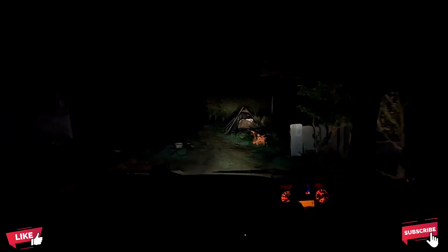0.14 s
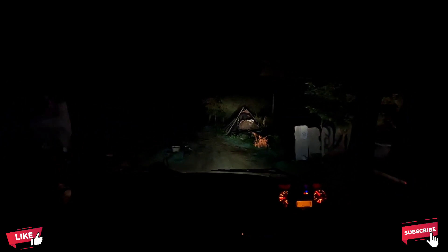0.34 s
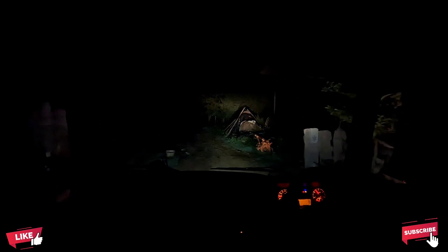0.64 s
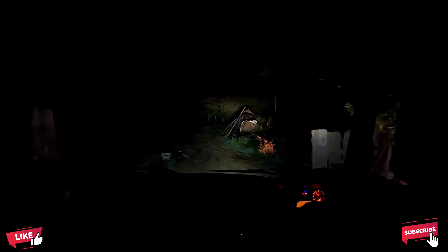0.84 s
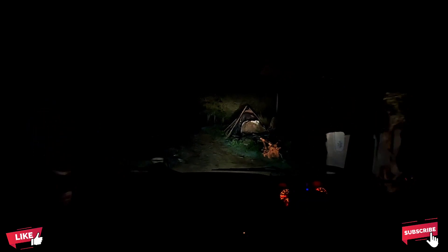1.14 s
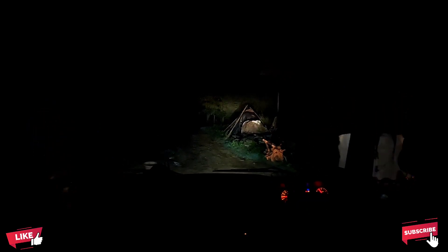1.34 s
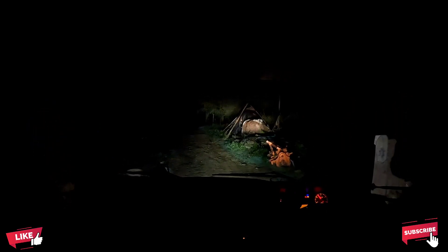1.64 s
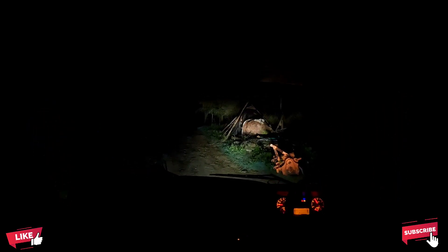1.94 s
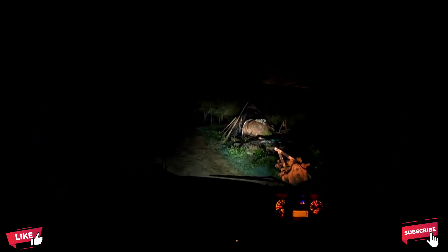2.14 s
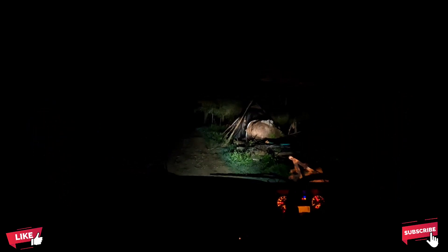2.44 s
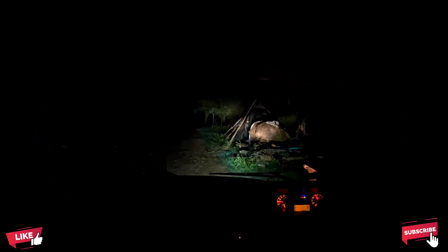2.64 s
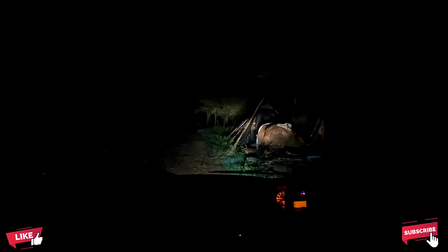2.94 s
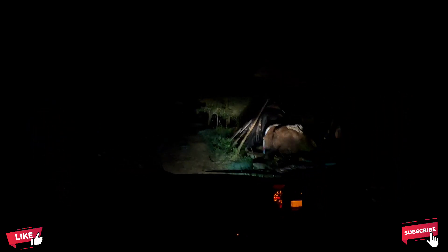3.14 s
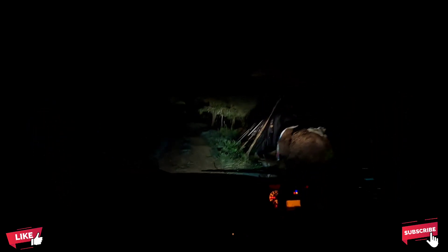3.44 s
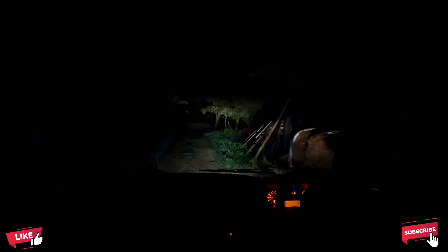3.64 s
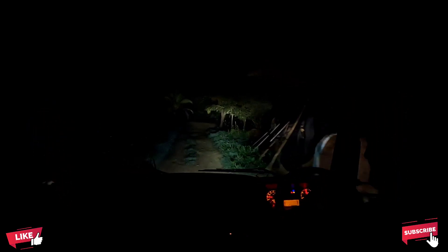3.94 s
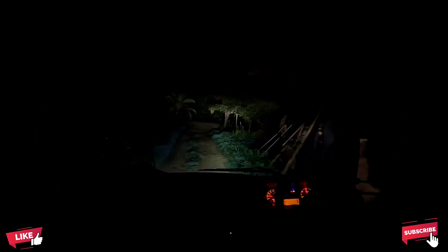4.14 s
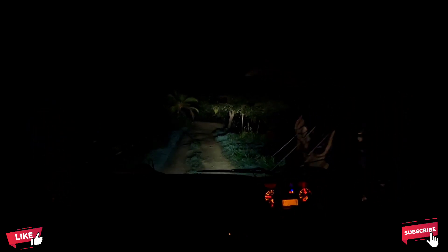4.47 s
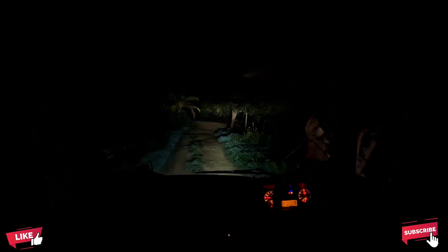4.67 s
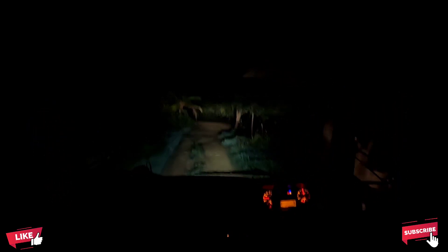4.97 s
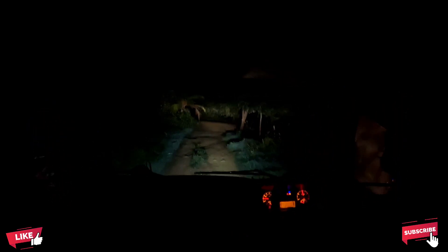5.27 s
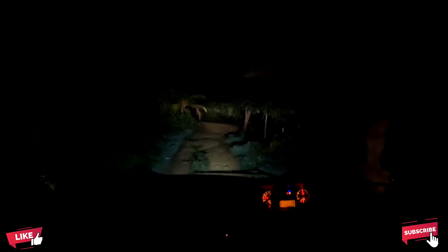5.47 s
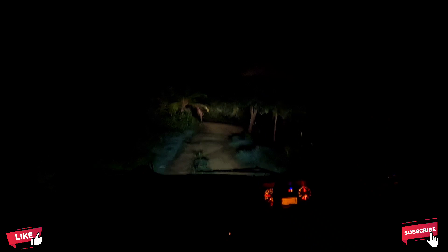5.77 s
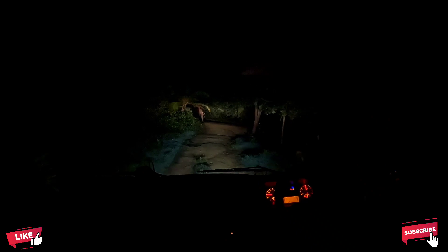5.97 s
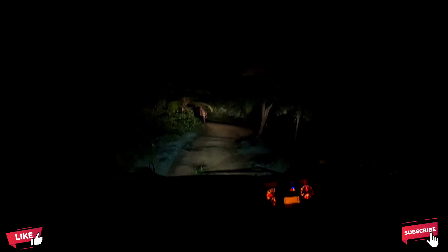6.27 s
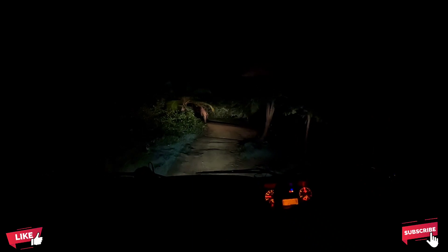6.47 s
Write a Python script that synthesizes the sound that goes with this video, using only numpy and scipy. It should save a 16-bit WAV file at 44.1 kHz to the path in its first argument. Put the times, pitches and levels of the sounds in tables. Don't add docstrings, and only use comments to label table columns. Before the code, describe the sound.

A heavy diesel labours up a dirt track, cab panels roaring and buzzing, loose metal sizzling, plastic knocking and small fittings clinking.

```python
import sys
import numpy as np
from scipy import signal
from scipy.fft import next_fast_len
from scipy.io import wavfile
from scipy.ndimage import uniform_filter1d

SR = 44100
rng = np.random.default_rng(int(sys.argv[2]) if len(sys.argv) > 2 else 0)


def persist_wave(psi):
    counts = np.round(np.clip(psi, -1, 1) * 32767).astype(np.int16)
    wavfile.write(sys.argv[1], SR, np.atleast_2d(counts).T)


def nominal_scale(level):
    x = np.asarray(level, float) / 20
    return 10 ** x


N = 291501

# (time [s], gear tooth rate [Hz], firing tone level [dB], gear whine level [dB])
DRIVELINE = [(0.0, 278, -21.5, -58), (0.25, 284, -31, -62), (0.42, 290.8, -19, -31),
             (0.76, 287.3, -31, -48), (1.13, 287.9, -27, -37.5), (1.7, 295, -19.5, -50),
             (1.87, 305, -22, -32.5), (2.12, 305, -22.5, -34), (2.3, 308, -23.5, -31.5),
             (2.45, 315, -23, -33.5), (2.64, 330, -20.5, -29.5), (2.82, 325, -24.5, -31),
             (2.95, 332, -24, -32), (3.1, 341, -26.5, -36), (3.17, 338, -23, -44), (3.3, 338, -26, -34),
             (3.48, 344, -51, -46), (3.6, 349, -37, -29), (3.8, 351, -32.5, -36.5),
             (4.1, 354.7, -29.5, -42), (4.4, 360.2, -23, -35.5), (4.9, 373.3, -22.5, -36.5),
             (5.1, 384, -28.5, -39), (5.25, 378, -26, -39), (5.5, 395, -38, -43), (5.65, 400, -35, -25.5),
             (5.75, 356, -31, -40), (6.0, 368, -31, -34), (6.1, 390, -37, -35), (6.2, 400, -33, -30.5),
             (6.33, 395, -28.5, -51), (6.43, 360, -31, -43), (6.55, 360, -31, -32)]
# (time [s], firing pitch over its geared value [ratio])
ENGINE_LUG = [(0.0, .92), (0.3, .97), (0.5, 1.02), (0.8, .96), (1.15, .96), (1.38, 1.09), (1.7, .96),
              (2.0, 1.03), (2.3, 1.0), (2.65, .99), (3.1, 1.0), (3.4, 1.05), (3.7, 1.08), (4.1, 1.0),
              (4.35, 1.05), (4.7, 1.0), (5.3, 1.03), (6.3, 1.04)]
# (time [s], change [dB])
FIRING_SURGES = [(0.24, -5), (0.44, 0), (0.79, -5), (0.88, 8), (0.96, -4), (1.12, 8), (1.19, -8),
                 (1.4, 2.5), (1.54, -3), (1.62, -11), (1.76, -11), (2.11, 6), (2.2, -6), (2.32, 2.5),
                 (2.43, 1.5), (2.63, 2.5), (2.77, -14), (2.87, 7), (2.93, -7.5), (3.02, 3), (3.55, -8),
                 (3.7, 10), (3.9, -12), (4.13, 9.5), (4.2, -9), (4.4, 4), (4.58, -3), (4.72, 0.5),
                 (4.94, -11), (5.18, 3), (5.42, -10), (5.53, 4), (5.77, -1), (6.02, 8), (6.23, 6),
                 (6.38, -4), (6.53, 6)]
# (multiple of firing rate [ratio], level [dB])
ENGINE_ORDERS = [(.5, -17), (1.5, -19), (2, -25), (3, -22.5)]
TEETH_PER_FIRING, SURGE_S = 6.3, 0.061

# (time [s], swing level [dB], held for [s])
CAB_JOLTS = [(0.25, -25.5, 0.0092), (0.481, -16.5, 0), (0.79, -16, 0.0016), (1.1, -21, 0), (1.55, -18, 0.1),
             (1.93, -17.5, 0.021), (2.1, -12.5, 0), (2.28, -13, 0.038), (2.62, -11.5, 0), (2.76, -17.5, 0),
             (2.84, -18.5, 0.053), (3.12, -16.5, 0.12), (3.33, -14.5, 0.28), (3.6, -12.5, 0.0093),
             (3.81, -11.5, 0.058), (4.07, -13, 0.074), (4.3, -16.5, 0.12), (4.449, -13.5, 0.032),
             (4.7, -15, 0), (4.92, -13.5, 0.034), (5.1, -25, 0.037), (5.2, -12.5, 0.25),
             (5.56, -11.5, 0.052), (5.75, -12, 0.013), (6.0, -13, 0), (6.15, -17, 0.00087),
             (6.35, -16.5, .26)]
# (time [s], swing pitch [Hz])
MOUNT_PITCH = [(0.0, 23.7), (0.11, 25.1), (0.22, 22.3), (0.37, 22.3), (0.48, 24.72), (1.12, 25.26),
               (1.25, 23.52), (1.67, 23.4), (1.77, 24.9), (2.83, 25.06), (3.09, 26.54), (3.48, 24.66),
               (5.12, 27.15), (5.21, 24.88), (5.89, 24.9), (6.04, 22.27), (6.41, 23.65), (6.61, 23.4)]
SWING_RISE_DB_PER_S, SWING_FALL_DB_PER_S = 151, 158

# (time [s], shake level [dB])
TRACK_SHAKE = [(0.0, -10), (0.2, -8), (0.5, -4), (0.74, -8), (1.2, -5), (1.56, -3.5), (1.76, -5.5),
               (1.9, -0.5), (2.2, -3), (3.1, 0.5), (3.4, 1), (4.35, 1), (4.53, 2), (4.66, 1), (5.3, 3),
               (5.62, 5), (5.82, 1.5), (6.61, 2)]
# (time [s], extra rumble [dB])
TYRE_RUTS = [(0.0, -1.5), (0.5, 3), (0.9, 4.5), (1.56, 8), (1.87, 4.5), (3.138, 2), (4.4, 2.5), (4.9, 6.5),
             (5.6, 1.5), (5.96, 5.5), (6.2, 8.5), (6.61, -0.5)]
# (frequency [Hz], level [dB per Hz])
ROAR_SPECTRUM = [(110, -23), (190, -7), (285, -0.5), (357, -1), (463, -3.5), (555, -8), (648, -7),
                 (893, -13), (1500, -19.5), (1950, -24), (3300, -120)]
# (frequency [Hz], level [dB per Hz])
RUMBLE_SPECTRUM = [(8.2, -37), (14, -5.5), (43, 0), (61, -14), (97, -16.5), (150, -18.5), (260, -19.5),
                   (340, -61), (570, -120)]
# (frequency [Hz], width [Hz], level [dB])
PANEL_RINGS = [(111.3, 17, 0.5), (166, 12, -9), (286, 24, 2), (459, 28, 4.5), (634, 33, 0), (964, 103, -6),
               (1317, 100, -18.5)]
RUT_S = 0.049
ROAR_DB, RATTLE_DB, TYRE_DB = -30, -40, -34
ROAR_FOLLOWS, RATTLE_FOLLOWS, TYRE_FOLLOWS = 0.83, 0.8, 0.12
TYRE_LUMPS_DB = 1.43

# (frequency [Hz], level [dB per Hz])
BUZZ_SPECTRUM = [(410, -36), (700, -1), (896, -7), (981, 0.5), (1190, -4.5), (1370, -4), (3510, -25),
                 (5000, -45), (6500, -53), (11000, -120)]
# (frequency [Hz], level [dB per Hz])
HISS_SPECTRUM = [(2120, -26), (3600, -20), (4940, 2.5), (5660, 0), (7750, 0), (10900, -3.5), (15100, -15),
                 (15800, -20)]
SETTLES_S, SETTLED_DB = 5.8, -3.5

# (frequency [Hz], width [Hz], level [dB])
METAL_RINGS = [(5650, 510, 3), (7430, 1300, -2.5), (11000, 560, -13)]
# (start [s], end [s], sizzle level [dB])
CHATTER_SPELLS = [
    (0.46, 0.86, -61),
    (1.153, 1.62, -56.5),
    (1.663, 2.599, -56),
    (2.586, 3.296, -56),
    (3.3, 5.1, -57),
    (5.1, 5.62, -54.5),
]
# (time [s], swell [dB])
CHATTER_BURSTS = [(1.2, -2), (1.41, 2), (1.445, 1), (1.65, -5), (1.75, -7), (2.05, 5), (2.3, -1), (2.5, -3),
                  (2.68, 6), (2.78, 2), (2.87, 2), (2.95, 7), (3.05, -2), (3.1, 5.5), (3.17, 4.5),
                  (3.25, -7), (3.32, 2), (3.42, 3), (3.52, 3), (3.6, 3), (3.68, 0), (3.76, 4), (3.86, -5),
                  (4.03, 1), (4.2, -5), (4.27, 3), (4.43, 5.5), (4.53, 3), (4.61, 2), (4.68, -1), (4.74, 1),
                  (4.82, -2), (4.88, 3), (4.98, -3), (5.08, 0), (5.13, -2), (5.19, 5), (5.27, 2),
                  (5.37, -3), (5.44, 4.5), (5.5, -2)]
# (time [s], change of pitch [Hz])
SEAT_SHIFT = [(1.1, 50), (1.48, 100), (1.52, 350.5), (1.62, 0), (2.6, -49), (2.95, 50), (3.3, 30),
              (3.5, -50.5), (3.62, 120), (4.1, 61), (4.6, 29.5), (4.9, -150), (5.2, 0.5), (5.6, -120)]
SPELL_EASE_S, RESTING_DB, BURST_S = 0.088, -87, 0.026

# (time [s], peak level [dB], main ring [Hz], crack level [dB])
HEAVY_KNOCKS = [(0.164, -33, 870, -22), (0.3158, -23.5, 1500, -20), (0.7906, -27.5, 976, -27),
                (1.26, -28.5, 1080, -24), (1.4435, -25.5, 1750, -21), (1.8153, -26.5, 1374, -10.5),
                (2.441, -38, 1360, -23), (3.4165, -27.5, 1900, -14), (4.0742, -24, 1371, -34),
                (4.3265, -30, 2560, -11), (4.6541, -15, 1300, -57), (5.5239, -17.5, 1347, -38),
                (5.532, -20, 450, -43), (5.5498, -31, 1616, -10), (5.72, -25.5, 600, -40),
                (5.6146, -22, 1910, -22), (5.655, -24, 854, -40), (5.7055, -32.5, 3670, -6),
                (5.712, -25, 950, -35), (5.7675, -36, 1160, -2), (6.19, -21, 516, -60)]
# (time [s], peak level [dB], main ring [Hz], crack level [dB])
LIGHT_KNOCKS = [(0.3027, -29, 2400, -14), (0.9567, -27, 2120, -25), (1.5, -23.5, 1440, -31),
                (1.5183, -35, 2100, -30), (1.5638, -25, 1610, -28), (1.6054, -23, 810, -50),
                (2.0287, -22, 1335, -18), (5.222, -34, 4500, -8), (4.657, -28, 470, -20),
                (4.076, -38, 4300, -10), (2.0657, -19, 1350, -36), (2.1444, -29.5, 940, -12),
                (2.8669, -31, 1080, -34), (3.793, -23, 950, -31), (4.3981, -25, 1320, -39),
                (4.7269, -26, 1040, -20), (5.1862, -22, 1360, -32), (5.219, -23, 1400, -19),
                (5.571, -30, 2580, -8), (5.576, -20.5, 1200, -23), (6.0855, -40, 3500, 0),
                (6.476, -39, 2830, -7),
                (1.4657, -27, 890, -32), (1.817, -33, 2600, -20), (1.947, -36, 1490, -12),
              (1.532, -28, 1800, -27), (1.55, -28, 2000, -28), (1.575, -27, 2220, -23),
              (2.5211, -40, 2100, -17), (2.6287, -39, 2101, -17), (2.9699, -34, 1855, -18),
              (3.0449, -35, 1850, -20), (3.127, -35, 2100, -23), (3.3936, -37, 1890, -18),
              (3.7009, -40, 2100, -15), (3.871, -30, 1798, -22), (3.9718, -40, 2130, -12),
              (4.2445, -33, 2108, -14), (5.537, -22, 1004, -27), (5.596, -37, 1850, -18),
              (5.633, -26.5, 3300, -12), (5.658, -32, 4500, -10), (5.695, -28, 3700, -10),
              (5.7503, -40, 2100, -14), (5.78, -36, 3000, -9)]
# (frequency [Hz], level [dB], time to fall by 60 dB [s])
TRIM_MODES = [(340, -5, .03), (468, -1, .04), (640, -2, .028), (820, -3, .022), (1040, -1, .026),
              (1365, 0, .03), (1600, -3, .024), (1850, -3, .024), (2150, -5, .026), (2500, -5, .026),
              (2850, -8, .02), (3300, -9, .02), (3800, -12, .016), (4500, -12, .016), (5200, -18, .01)]
HEAVY_THUD_DB, LIGHT_THUD_DB = 6, -0.5

# (time [s], peak level [dB], main ring [Hz], top level [dB])
METAL_CLINKS = [(0.0478, -50, 7300, -6), (0.2892, -34, 6450, -27), (0.3245, -38, 6800, -12),
                (0.4555, -38.5, 5530, -24), (0.5994, -46, 7680, -18), (0.7562, -40, 6040, -21),
                (1.2236, -43, 5714, -15), (1.498, -37.5, 5900, -17), (1.511, -40, 6200, -20),
                (1.567, -46, 5900, -20), (1.575, -48, 7900, -20), (1.58, -46, 5650, -19),
                (1.8552, -46, 8300, -14), (0.825, -48, 5980, -18), (2.6304, -48, 5550, -20),
                (3.6994, -45, 5918, 9), (3.772, -39, 9560, -9), (3.9732, -35.5, 6834, -3),
                (4.0787, -45, 5980, -15), (4.247, -45, 5580, -18), (4.3262, -37.5, 5482, -18),
                (4.7894, -43, 7953, -10), (5.165, -42, 5707, -22), (5.2394, -46, 5600, -14),
                (5.3042, -39, 5740, -3), (5.5292, -45, 5535, -11), (5.5494, -48, 9550, -4),
                (5.6094, -44, 10500, -4), (5.629, -36, 11500, 0), (5.6071, -41, 13000, 0),
                (5.5966, -46, 12000, 0), (5.7096, -44, 5475, -15), (5.7765, -45, 7900, -3),
                (6.1697, -39.5, 8050, -11), (6.4751, -31, 7920, -14), (6.478, -37.5, 6180, -20),
                (0.184, -45, 9500, -8), (0.3162, -45, 9500, -8), (0.345, -47, 6800, -15),
                (1.2451, -42, 9500, -8), (2.4543, -50, 10500, -8), (2.4882, -49, 10500, -8),
                (2.7347, -48, 10490, -8), (3.1462, -48, 9500, -8), (3.7938, -48, 10460, -8),
                (4.4428, -39, 11600, -9), (5.695, -40, 5745, -6), (6.437, -46, 7900, -20)]
# (frequency [Hz], level [dB], time to fall by 60 dB [s])
FITTING_MODES = [(4600, -12, .005), (5650, -2, .012), (6200, -1, .01), (6800, -3, .007), (7400, -3, .007),
                 (7940, -2, .01), (8600, -4, .006), (9500, -5, .005), (10500, -6, .005), (11600, -7, .004),
                 (13000, -8, .003), (14500, -9, .003)]

# (start [s], end [s], trim level [dB], metal level [dB], bright grit level [dB])
LOAD_SLIDES = [
    (1.495, 1.638, -33.5, -49, -62),
    (5.52, 5.8, -38, -62, -47.5),
    (0.16, 0.23, -48, -62, -60),
]
# (time [s], peak level [dB], pitch [Hz])
FLOOR_THUMPS = [
    (0.45, -36, 105),
    (0.7, -28.5, 95),
    (1.8, -27, 112),
    (2.1, -29, 112),
    (4.5, -26, 95),
    (5.62, -30, 108),
    (6.2, -25, 38),
    (1.9, -20, 38),
    (0.8, -25, 30),
]
THUMP_S = 0.033
SQUEAK_FROM_S, SQUEAK_HZ, SQUEAK_DB = 6.05, 2830, -64
OVERLOAD_S, OVERLOAD_LASTS_S, OVERLOAD_DB = 5.5875, .0022, -11


def rms_one(x):
    return x / np.sqrt(np.mean(x ** 2) + 1e-20)


def in_time(rows):
    s, *columns = np.transpose(rows)
    return [np.interp(np.arange(N) / SR, s, c) for c in columns]


def swells_db(rows, width_s):
    t = np.arange(N) / SR
    return sum(db * np.exp(-((t - s) / width_s) ** 2) for s, db in rows)


def drift(rate):
    r = np.exp(-80 * np.pi * rate / SR)
    slow = signal.lfilter([1], [1, -2 * r, r * r], rng.standard_normal(N // 40 + 2002))[2000:]
    return np.interp(np.arange(N) / 40, np.arange(len(slow)), rms_one(slow))


def bandpass(x, order, low_hz, high_hz):
    return signal.sosfilt(signal.butter(order, [low_hz, high_hz], "band", fs=SR, output="sos"), x)


def lowpass(x, order, hz):
    return signal.sosfilt(signal.butter(order, hz, fs=SR, output="sos"), x)


def resonance(x, hz, width_hz):
    r = np.exp(-np.pi * width_hz / SR)
    w = 2 * np.pi * hz / SR
    return signal.lfilter(np.array([1, 0, -1]) * (1 - r * r) / 2, [1, -2 * r * np.cos(w), r * r], x)


def double_resonance(x, hz, width_hz):
    return resonance(resonance(x, hz, width_hz), hz, width_hz)


def ring(push, hz, t60):
    r, w = nominal_scale(-60 / (t60 * SR)), 2 * np.pi * hz / SR
    return signal.lfilter([0, np.sin(w)], [1, -2 * r * np.cos(w), r * r], push)


def near(hz, centre_hz, octaves):
    return np.exp(-(np.log2(hz / centre_hz) / octaves) ** 2)


def tone(hz, level_db, wobble):
    phase = 2 * np.pi * np.cumsum(hz * (1 + wobble * drift(5.44))) / SR
    return np.sqrt(2) * nominal_scale(level_db) * np.sin(phase)


def banded_noise(spectrum, patchy_db, shared_db):
    hz, level_db = np.transpose(spectrum)
    octaves = np.log2(min(hz[-1], .35 * SR) / hz[0])
    edges = hz[0] * 2 ** np.arange(0, octaves + 1 / 3, 1 / 3)
    white, together, out = rng.standard_normal((2, N + SR)), drift(6.1), 0
    for k, (low, high) in enumerate(zip(edges, edges[1:])):
        band = bandpass(white[k % 2], 2, low, high)[SR:]
        band_db = np.interp(np.log(low * high) / 2, np.log(hz), level_db)
        out = out + band * nominal_scale(band_db + patchy_db * drift(18.0) + shared_db * together)
    return rms_one(out)


def grains(per_s, spread_db):
    sizes = nominal_scale(spread_db * np.minimum(rng.exponential(1, N), 5)) * rng.choice([-1, 1], N)
    touches = rng.random(N) < per_s * nominal_scale(6.0 * drift(14.0)) / SR
    return rms_one(sizes * touches) + 1e-18


def engine():
    whine_hz, tone_db, whine_db = in_time(DRIVELINE)
    firing_hz = whine_hz / TEETH_PER_FIRING * in_time(ENGINE_LUG)[0]
    orders = sum(tone(k * firing_hz, tone_db + level_db + 0.87 * drift(0.5), wobble=0.019)
                 for k, level_db in ENGINE_ORDERS)
    firing_db = tone_db - 1 + swells_db(FIRING_SURGES, SURGE_S) + 2.5 * drift(9.0)
    firing = tone(firing_hz, firing_db, wobble=.03)
    waver_db = np.interp(whine_hz, [330, 345], [1.2, 3.5]) * drift(14.0)
    whine_wobble = np.interp(whine_hz, [330, 351, 362], [.003, .006, .025])
    return firing + orders + tone(whine_hz, whine_db + waver_db, wobble=whine_wobble)


def cab_boom():
    t = np.arange(N) / SR
    level_db = np.full(N, -45.)
    for s, db, held_s in CAB_JOLTS:
        rise_db = SWING_RISE_DB_PER_S * np.maximum(s - t, 0)
        fall_db = SWING_FALL_DB_PER_S * np.maximum(t - s - held_s, 0)
        level_db = np.maximum(level_db, db - rise_db - fall_db)
    road_jolts = rms_one(double_resonance(rng.standard_normal(N + SR), 21.0, 17.5)[SR:])
    blur_db = uniform_filter1d(level_db, SR // 5) - 9
    return tone(in_time(MOUNT_PITCH)[0], level_db - 0.3, wobble=0.015) + nominal_scale(blur_db) * road_jolts


def panels(roar_db, rumble_db):
    firings = np.cumsum(in_time(DRIVELINE)[0] / TEETH_PER_FIRING) / SR
    fired = np.diff(np.floor(firings), prepend=0)
    drive = rms_one(fired * nominal_scale(rng.normal(0, 12.7, N))) * 0.29 + rng.standard_normal(N)
    rings = sum((-1) ** k * nominal_scale(level_db) * rms_one(resonance(drive, hz, width))
                for k, (hz, width, level_db) in enumerate(PANEL_RINGS))
    roar = nominal_scale(-1.0) * banded_noise(ROAR_SPECTRUM, patchy_db=-0.74, shared_db=-0.46)
    roar = roar + nominal_scale(-2.0) * rms_one(rings)
    rumble = banded_noise(RUMBLE_SPECTRUM, patchy_db=0.4, shared_db=-0.5)
    return nominal_scale(roar_db) * roar + nominal_scale(rumble_db + 9.0) * rumble


def rattle(rattle_db):
    ticks = bandpass(grains(430.0, spread_db=3.5), 2, 900, 3200)
    buzz = nominal_scale(1.0) * banded_noise(BUZZ_SPECTRUM, patchy_db=1.76, shared_db=-1.15)
    buzz = buzz + nominal_scale(-19.0) * rms_one(ticks)
    hiss_db = -56.5 + 0.54 * (rattle_db + 40.5)
    hiss = banded_noise(HISS_SPECTRUM, patchy_db=1.95, shared_db=1.0)
    return nominal_scale(rattle_db) * buzz + nominal_scale(hiss_db) * hiss


def chatter_db():
    t, ease = np.arange(N) / SR, SPELL_EASE_S
    power = sum(nominal_scale(2 * db) * np.interp(t, [a - ease, a + ease, b - ease, b + ease], [0, 1, 1, 0])
                for a, b, db in CHATTER_SPELLS)
    return 10 * np.log10(power + nominal_scale(2 * RESTING_DB))


def sizzle(sizzle_db):
    drive = .6 * rng.standard_normal(N) + .8 * grains(1500.0, spread_db=2.5)
    rings = sum(nominal_scale(level_db) * rms_one(double_resonance(drive, hz, width))
                for hz, width, level_db in METAL_RINGS)
    turning = np.exp(2j * np.pi * np.cumsum(in_time(SEAT_SHIFT)[0]) / SR)
    slid = np.real(signal.hilbert(rings, next_fast_len(N))[:N] * turning)
    return nominal_scale(sizzle_db - 5.5 + 1.36 * swells_db(CHATTER_BURSTS, BURST_S)) * slid


def blows(events, modes, colour, scatter_db, lead_s, rise_s, struck_db, struck_cycles):
    out, t = np.zeros(N + SR), np.arange(SR // 8) / SR
    rise = np.minimum(t / rise_s, 1)
    chance = rng.standard_normal((len(events), len(t) + 2 * len(modes)))
    for (s, peak_db, main_hz, *character), draw in zip(events, chance):
        push = draw[:len(t)] * (np.exp(-t / .012) + .45 * np.exp(-t / .003)) * rise
        push = push / np.sqrt(np.sum(push ** 2))
        start = round((s - lead_s) * SR)
        spot = rise * nominal_scale(-60 * t * main_hz / struck_cycles) * np.sin(2 * np.pi * main_hz * t)
        out[start:start + len(t)] += nominal_scale(peak_db + struck_db) * spot
        for (hz, level_db, t60), (own, detune) in zip(modes, draw[len(t):].reshape(-1, 2)):
            gain = nominal_scale(peak_db + level_db + colour(hz, main_hz, *character) + scatter_db * own)
            late = start + round(.006 * SR) * (hz < 600)
            out[late:late + len(t)] += gain * ring(push, hz * (1 + .025 * detune), .9 * t60)
    return out[:N]


def knock_colour(hz, main_hz, thud_db, crack_db):
    favoured = 6 * near(hz, main_hz, .35) - 4
    return favoured + (thud_db + 1.0) * (hz < 700) + (crack_db + 11.5) * near(hz, 3400, 1.0)


def trim_knocks():
    kinds = [(HEAVY_KNOCKS, HEAVY_THUD_DB), (LIGHT_KNOCKS, LIGHT_THUD_DB)]
    events = [(s, db, hz, thud_db, crack_db) for table, thud_db in kinds for s, db, hz, crack_db in table]
    knocks = blows(events, TRIM_MODES, knock_colour, scatter_db=1.8, lead_s=.0018, rise_s=.003,
                   struck_db=-2, struck_cycles=50)
    return lowpass(knocks, 4, 4600)


def clink_colour(hz, main_hz, top_db):
    favoured = 10 * near(hz, main_hz, .14) - 3
    return favoured + np.minimum(top_db + 9, 5) * np.clip(hz / 4000 - 2, 0, 1.2)


def fitting_clinks():
    clinks = blows(METAL_CLINKS, FITTING_MODES, clink_colour, scatter_db=2.5, lead_s=.002, rise_s=.004,
                   struck_db=-8, struck_cycles=120)
    return bandpass(clinks, 3, 5400, 14500)


def slides():
    t = np.arange(N) / SR
    grit = grains(900.0, spread_db=3) + .5 * rng.standard_normal(N)
    trim = sum(nominal_scale(level_db) * ring(grit, hz, 0.52 * t60) for hz, level_db, t60 in TRIM_MODES[4:-3])
    trim = rms_one(lowpass(trim, 4, 3400))
    metal = rms_one(sum(nominal_scale(level_db) * double_resonance(grit, hz, 2 * width)
                        for hz, width, level_db in METAL_RINGS))
    scratch = rms_one(bandpass(grit, 2, 3500, 13000))
    out = np.zeros(N)
    for start, end, trim_db, metal_db, grit_db in LOAD_SLIDES:
        drag = np.interp(t, [start, start + 0.013, end - .03, end], [0.05, 0.69, 0.32, 0.016])
        out += drag * (nominal_scale(trim_db) * trim + nominal_scale(metal_db) * metal + nominal_scale(grit_db) * scratch)
    return out


def thumps():
    t = np.arange(N) / SR
    return sum(nominal_scale(db) * np.exp(-((t - s) / THUMP_S) ** 2) * np.sin(2 * np.pi * hz * t)
               for s, db, hz in FLOOR_THUMPS)


def squeak():
    start = np.clip((np.arange(N) / SR - SQUEAK_FROM_S) / .05, 0, 1)
    return start * tone(SQUEAK_HZ, SQUEAK_DB + 3.0 * drift(16.0), wobble=0.0094)


def scene():
    shake_db, = in_time(TRACK_SHAKE)
    roar_db = ROAR_DB + ROAR_FOLLOWS * shake_db
    rattle_db = RATTLE_DB + RATTLE_FOLLOWS * shake_db + SETTLED_DB * (np.arange(N) > SETTLES_S * SR)
    rumble_db = TYRE_DB + TYRE_FOLLOWS * shake_db + TYRE_LUMPS_DB * drift(3.5) + swells_db(TYRE_RUTS, RUT_S)
    steady = engine() + cab_boom() + panels(roar_db, rumble_db) + rattle(rattle_db) + sizzle(chatter_db())
    struck = nominal_scale(0.53) * trim_knocks() + nominal_scale(-2.0) * fitting_clinks()
    return (steady + struck + slides() + thumps() + squeak())[None]


def roll_off(x):
    return signal.sosfilt(signal.butter(12, 15730, fs=SR, output="sos"), x)


def record(dry):
    ease = np.minimum((N - np.arange(N)) / (.004 * SR), 1)
    lows = signal.sosfiltfilt(signal.butter(2, 500, fs=SR, output="sos"), dry)
    choked = lows + (dry - lows) * nominal_scale(swells_db([(OVERLOAD_S, OVERLOAD_DB)], OVERLOAD_LASTS_S))
    rounded = 1.6 * np.tanh(choked / 1.7)
    rounded = signal.sosfilt(signal.cheby2(12, 40, 16700, fs=SR, output="sos"), rounded)
    return roll_off(rounded * ease)


dry = scene()
out = record(dry)
persist_wave(out)
```